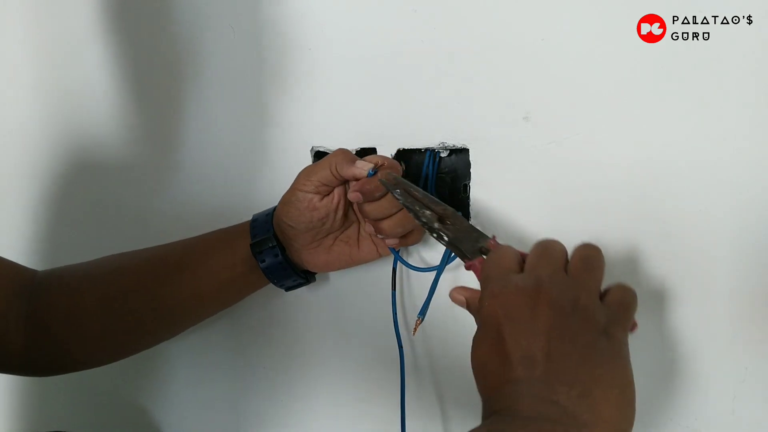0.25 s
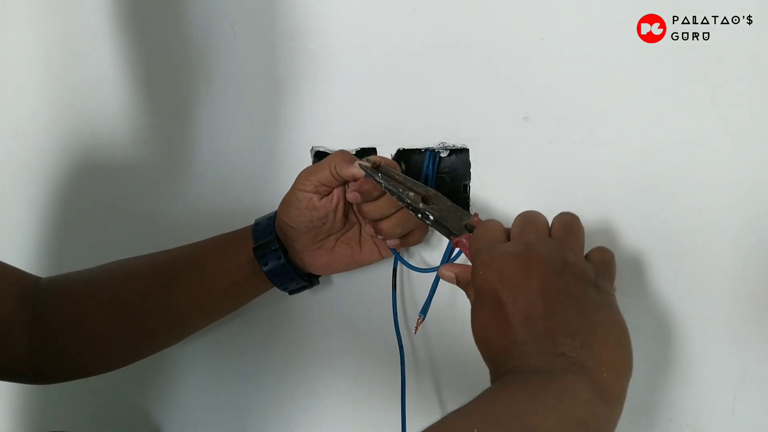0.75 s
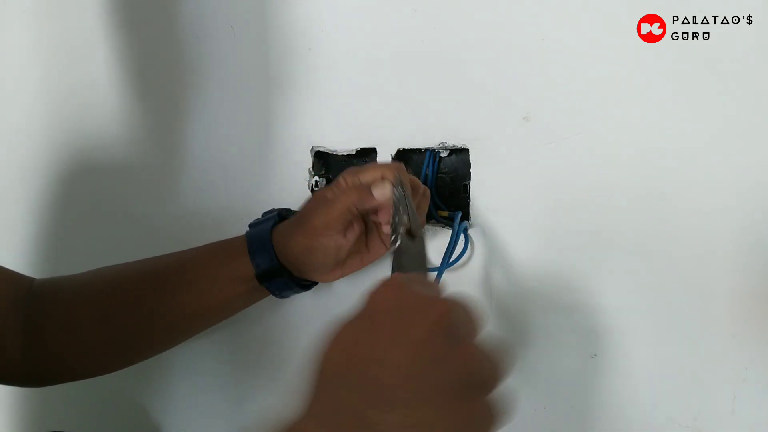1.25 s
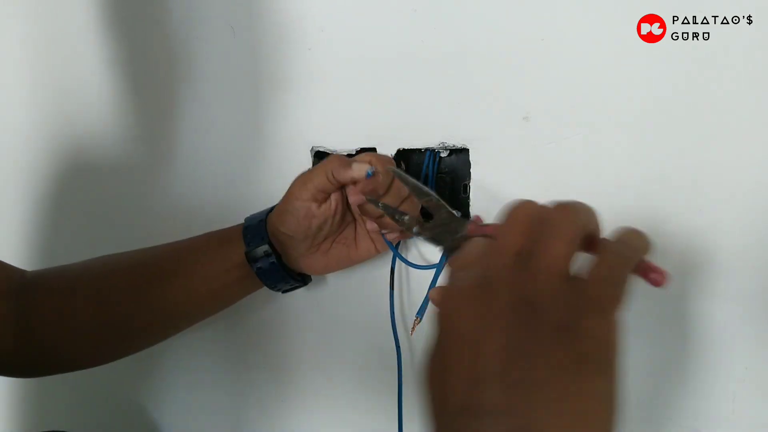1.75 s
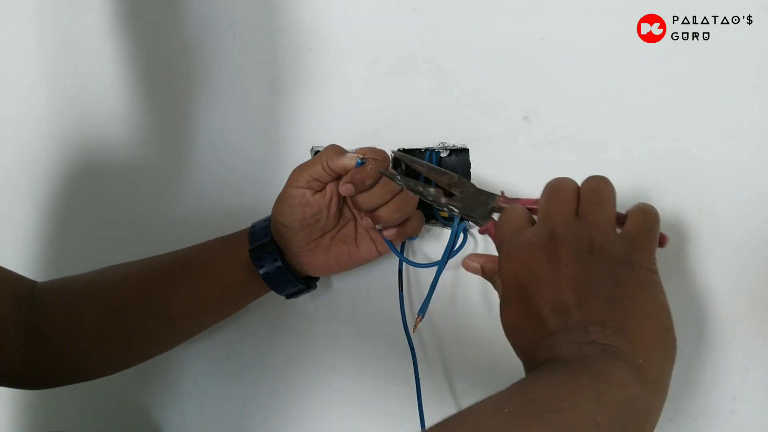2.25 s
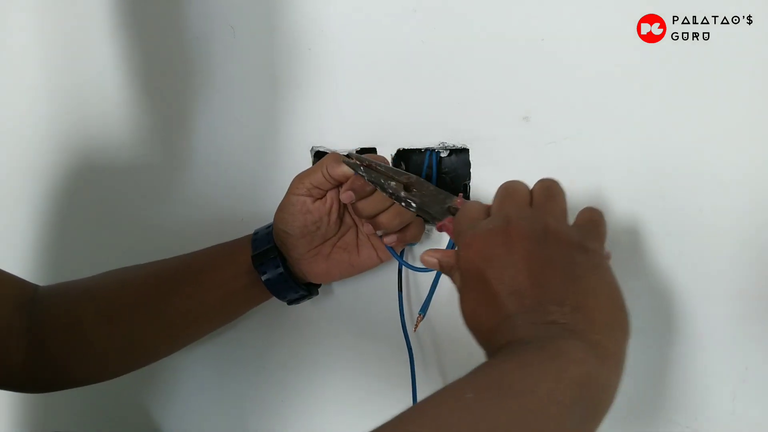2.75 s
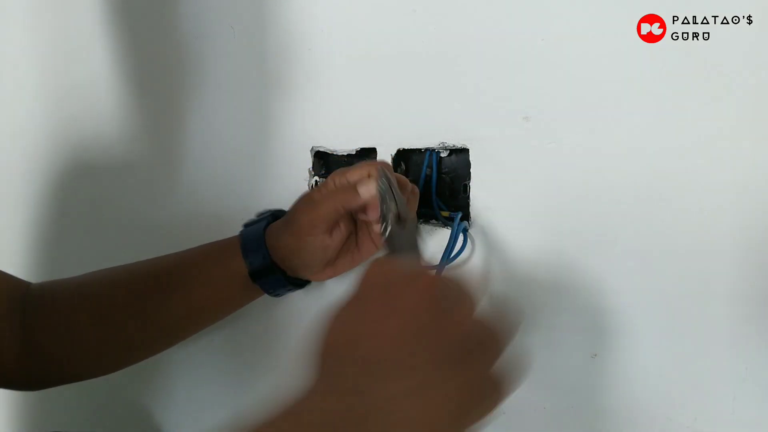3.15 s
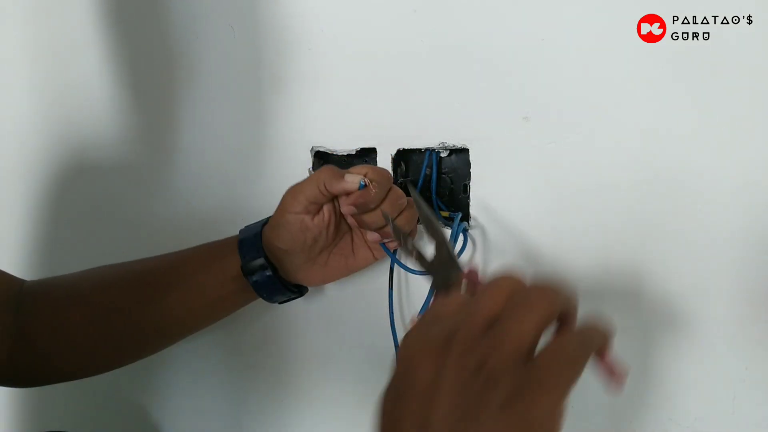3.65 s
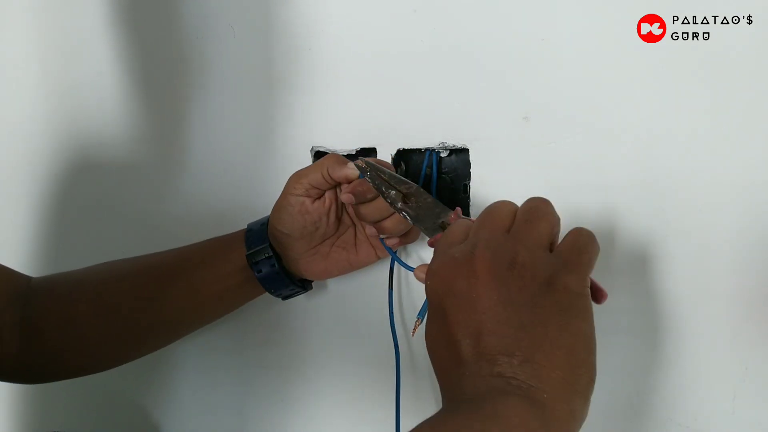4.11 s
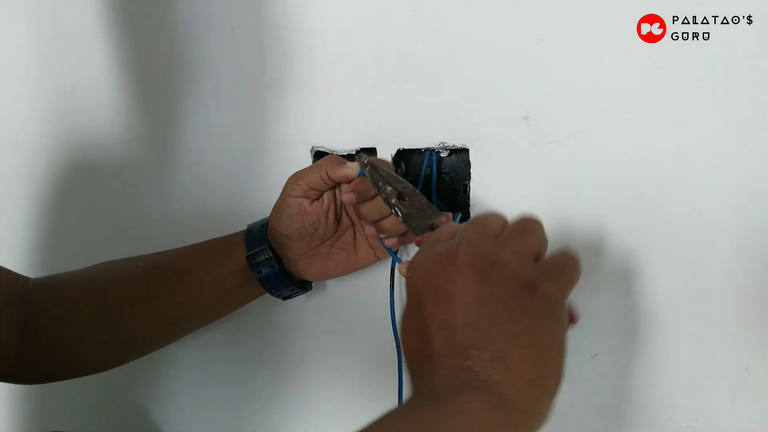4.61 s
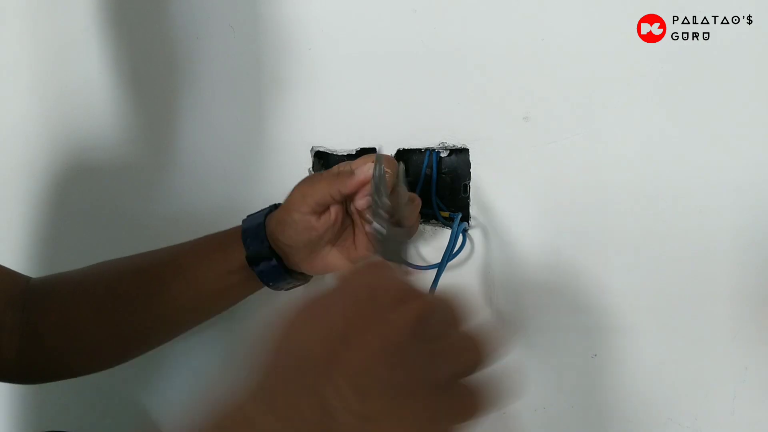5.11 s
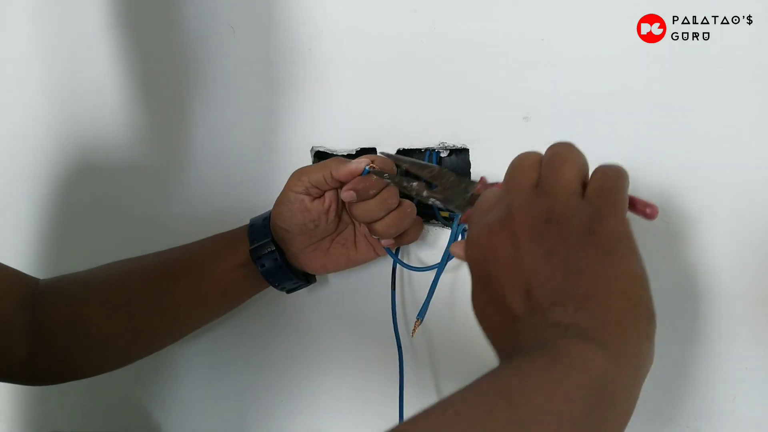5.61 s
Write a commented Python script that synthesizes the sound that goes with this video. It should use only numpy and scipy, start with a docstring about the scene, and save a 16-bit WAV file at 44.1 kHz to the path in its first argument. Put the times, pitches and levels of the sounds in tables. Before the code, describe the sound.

Stiff wires knock and creak in a wall box as pliers click and scrape, in a humming room.

```python
"""Twisting wires with pliers

Steel pliers twist copper wires together at a wall box, three turns, in a bare, humming room.
The stiff wires knock and creak in the box, and a hand bumps the handles. The jaws tick as they
grip, then scrape and squeak as they slide off. A noise gate cuts the treble of each echo short."""
import sys
import numpy as np
from scipy import signal
from scipy.fft import rfft, irfft, dct
from scipy.io import wavfile
from scipy.ndimage import uniform_filter1d, minimum_filter1d

SR = 44100
rng = np.random.default_rng(int(sys.argv[2]) if len(sys.argv) > 2 else 0)


def output_pcm(signal):
    """Save a mono or channel-first signal as 16-bit PCM at the path in sys.argv[1].

    Samples are clipped to [-1, 1] before scaling.
    """
    pcm = np.clip(np.atleast_2d(signal).T, -1, 1) * 32767
    wavfile.write(sys.argv[1], SR, np.round(pcm).astype(np.int16))


N = 258866

# The tone of the room's rumble and hiss. Each row: frequency in Hz, relative level in dB.
RUMBLE_TONE = [(14, -2), (42, 2), (60, -10.5), (76, -6.5), (97, -10), (140, -12), (165, -18.5), (370, -23),
               (617, -25.5), (944, -40.5), (1500, -58.5), (2500, -110)]
HISS_TONE = [(200, -15.5), (900, -1), (1500, 2.5), (3000, 1.5), (5000, -6.5), (8000, -11.5), (11000, -16.5),
             (13000, -26), (16000, -31)]
# How alike that noise is left and right. Each row: frequency in Hz, likeness (1 is identical).
LIKENESS = [(60, 0.69), (180, 0.49), (550, 0.35), (1650, 0), (4970, 0.0), (15000, 0.0063)]
# The room's hum. Each row: pitch in Hz, level in dB, waver in radians.
HUM_TONES = [(40.4, -57.5, 3.98), (74.3, -60.5, 2.4), (126.04, -56.5, 0.75), (186.2, -69, 1.6),
             (306.6, -71.5, 1.2)]
# The slow swell of the deep bass. Each row: time in seconds, gain in dB.
BASS_SWELL = [(0, 6), (2, 5.5), (3.5, 3.5), (4.4, 6), (5.1, 7), (5.87, 6)]
# Wires knocking in the box. Each row: start in seconds, relative level in dB, relative treble in dB.
KNOCKS = [(0.695, -30.5, -21), (1.284, -41, -2), (1.453, -30, -3.5), (1.873, -50.5, 0),
          (2.963, -50.5, -2.5), (3.091, -47.5, -4), (3.229, -33.5, -4.5), (3.372, -21.5, -2.5),
          (3.992, -44.5, -10), (4.465, -46, 0), (5.202, -44.5, -7.5), (5.595, -56.5, -20)]
# How the box and the pliers ring. Each row: pitch in Hz, level in dB, seconds to fade by 60 dB.
BOX_MODES = [(569, 1, 0.031), (650, 6.5, 0.019), (817, -5, 0.029), (1202, -15, 0.027), (1482, -17, 0.043),
             (1751, -3, 0.0094), (2290, -6.5, 0.0048), (3032, -8, 0.007), (3505, -18.5, 0.015)]
STEEL_MODES = [(2370, 6.5, 0.0053), (2850, 9.5, 0.0076), (3480, -5, 0.0068), (5350, -5, 0.0089),
               (5860, -2.5, 0.0086), (7510, -1.5, 0.028), (8240, 1, 0.025), (11300, -14, 0.0054),
               (10850, 9.5, 0.011), (11440, 3, .012), (15650, -28, .01)]
# The tone of one slip's snap. Each row: frequency in Hz, gain in dB.
SNAP_TONE = [(300, -7.5), (1200, -2), (2200, 6), (4000, 4), (6500, 3.5), (8300, 4.5), (10800, -3),
             (11800, -4), (14000, -19), (16000, -2)]
# Jaws catching on copper. Each row: start in seconds, relative level in dB, favoured pitch in Hz.
TICKS = [(0.695, -47.5, 3280), (1.048, -43, 2220), (1.1625, -47.5, 6700), (1.4162, -48, 3240),
         (1.5492, -42, 10700), (2.9123, -47.5, 2200), (3.4219, -30, 2300), (4.8852, -48, 10700),
         (4.962, -37.5, 2930), (5.1243, -40, 10900)]
# Jaws skipping. Each row: start and length in seconds, relative level in dB, favoured pitch in Hz.
SKIPS = [(1.135, 0.24, -52.5, 3110), (3.109, 0.04, -49, 7400), (3.283, 0.04, -40.5, 7400),
         (4.301, 0.04, -45.5, 7100)]
# Wires giving way. Each row: start and length in seconds, level in dB, relative treble in dB.
CREAKS = [(0.701, 0.115, -52.5, 1.5), (1.287, 0.044, -56.5, 8.5), (1.454, 0.15, -50.5, 7.5),
          (3.207, 0.066, -49, 6), (3.384, 0.17, -50, 2)]
# Jaws sliding. Each row: start and length in seconds, level in dB, favoured pitch in Hz,
# its boost in dB, tilt in dB per octave.
SCRAPES = [(1.048, 0.045, -61.5, 10700, 8.5, -3), (1.143, 0.23, -66.5, 7360, 8, -3),
           (1.49, 0.061, -54.5, 10300, 6.5, -4.5), (2.738, 0.045, -60, 4430, 9, -4),
           (3.196, 0.135, -55.5, 7160, 2, -7), (3.403, 0.028, -42.5, 8300, 1.5, -1),
           (4.324, 0.022, -59, 7400, 2, -4.5), (4.367, 0.61, -71.5, 11170, 15, -3),
           (5.085, 0.037, -57.5, 4800, 5, 0)]
# Slides that squeak. Each row: start and length in seconds, level in dB, pitch in Hz.
SQUEAKS = [(1.516, 0.025, -55, 5000), (4.96, 0.095, -58.5, 2897)]
# The tones in a squeak. Each row: multiple of the pitch, level in dB.
SQUEAK_HARMONICS = [(1, 2), (2, 1), (3, -10)]
# The room's echo. Each row: frequency in Hz, seconds to fade by 60 dB.
ECHO_FADE = [(200, 0.91), (500, 0.35), (1300, 0.5), (2700, 0.59), (5500, 0.51), (8000, 0.48), (14000, 0.37)]
# The stereo balance. Each row: frequency in Hz, dB by which left is louder than right.
BALANCE = [(500, 0), (2000, .5), (4500, 4), (8000, 0), (11500, -3)]
# The noise gate's two bands. Each row: lower edge in Hz, threshold in dB.
GATE_BANDS = [(1050, -58.5), (4000, -61.5)]

JAW_HZ = 3060  # the pitch favoured when the wires jolt the jaws


def amp(db):
    """Turns decibels into a gain."""
    return 10 ** (np.asarray(db) / 20)


def unit(x):
    """Scales a signal to an average (rms) level of 1."""
    return x / np.sqrt(np.mean(x ** 2) + 1e-20)


def read(table, hz):
    """Reads between a table's rows on a log-frequency axis."""
    row_hz, value = np.transpose(table)
    return np.interp(np.log(hz + 1), np.log(row_hz + 1), value)


def add(mix, start, sound):
    """Mixes a sound into both channels, start seconds in."""
    part = mix[:, round(start * SR):][:, :sound.shape[-1]]
    part += sound[..., :part.shape[1]]


def convolve(x, taps):
    """Filters each channel."""
    return signal.fftconvolve(np.atleast_2d(x), np.atleast_2d(taps), axes=1)


def colour(x, db_at, size=2048):
    """Changes the tone by db_at(Hz) decibels, with no ringing ahead of the sound."""
    log_gain = np.log(amp(db_at(abs(np.fft.fftfreq(size, 1 / SR)))))
    response = np.exp(np.conj(signal.hilbert(log_gain)))
    return convolve(x, np.fft.ifft(response).real[:size // 2])


def ring(modes, rise_cycles, size=4096):
    """A struck object rings with fading tones (modes); the low ones build up slowest."""
    t = np.arange(size) / SR
    wave = 0
    for hz, db, fade_s in modes:
        rise = 1 - np.exp(-(t * hz / rise_cycles) ** 2)
        wave += amp(db - 60 * t / fade_s) * np.sin(2 * np.pi * hz * t) * rise
    return wave / np.linalg.norm(wave)


def slips(length, per_s=3000, spread_db=4, fade=0.25, scatter=1.9):
    """Sticking and slipping makes uneven clicks; each spreads its own way, so left and right differ."""
    happens = rng.random(SR) < per_s / SR
    strength = amp(spread_db * np.minimum(rng.exponential(1, SR), 3))
    push = rng.choice([-1, 1], SR) + scatter * rng.standard_normal((2, SR))
    clicks = (happens * push * strength)[:, :int(length * SR)]
    return unit(clicks * signal.windows.tukey(clicks.shape[1], fade))


def background(waver_hz=2.27, low_cut_hz=33, rumble_db=-49, hiss_db=-65.5):
    """The room's low rumble and wavering hum, under a soft hiss."""
    hz, t = np.fft.rfftfreq(N, 1 / SR), np.arange(N) / SR
    left, other = rfft(rng.standard_normal((2, N)))
    alike = np.clip(read(LIKENESS, hz), 0, 1) ** 1.04
    right = alike * left + np.sqrt(1 - alike ** 2) * other
    noise = np.array([left, right]) * hz ** 2 / np.hypot(hz ** 2, low_cut_hz ** 2)
    out = np.zeros((2, N))
    for tone, db in [(RUMBLE_TONE, rumble_db), (HISS_TONE, hiss_db)]:
        out += amp(db) * unit(irfft(noise * amp(read(tone, hz)), N))
    for pitch, db, waver in HUM_TONES:
        slow_noise = irfft(rfft(rng.standard_normal((2, N))) * np.exp(-(hz / waver_hz) ** 2), N)
        drift, flutter = map(unit, slow_noise)
        out += amp(db) * unit((1 + 0.36 * flutter) * np.sin(2 * np.pi * pitch * t + waver * drift))
    return out


def swell(x, below_hz=90):
    """The deepest rumble rises and sinks slowly."""
    deep = irfft(rfft(x) / (1 + (np.fft.rfftfreq(N, 1 / SR) / below_hz) ** 6), N)
    gain_db = np.interp(np.arange(N) / SR, *np.transpose(BASS_SWELL))
    return x - deep + deep * amp(gain_db)


def knocks(boost_db=3, brighten_db=5, jaw_db=-17):
    """Each wire knock rings the box with its own brightness; louder, brighter ones jolt the jaws more."""
    out = np.zeros((2, N))
    for start, db, treble_db in KNOCKS:
        box = ring(BOX_MODES, rise_cycles=1.69)
        blow = colour(box, lambda f: (treble_db + brighten_db) * read([(750, 0), (1500, 1)], f))
        add(out, start, amp(db + boost_db) * blow / abs(blow).max())
        add(out, start, amp(db + 0.28 * treble_db + jaw_db) * tick(JAW_HZ))
    return out


def pliers(force, hz, boost_db, tilt_db, ring_db=-6, width_hz=750):
    """A snap plus the ring of the steel; the point of contact favours the pitches near hz."""
    def tone_db(f):
        bump = np.exp(-((f - hz) / width_hz) ** 2)
        return read(SNAP_TONE, f) + tilt_db * np.log2((f + 100) / hz) + boost_db * bump

    steel = amp(ring_db) * ring(STEEL_MODES, rise_cycles=1)
    steel[0] += 1  # the snap
    return colour(convolve(force, steel), tone_db)


def tick(hz, skid_s=0.0014, size=400):
    """One sharp contact of the jaws, with a brief gritty skid."""
    force = rng.standard_normal((2, size)) * np.exp(-np.arange(size) / SR / skid_s)
    force[:, 0] += 1
    wave = pliers(force, hz, boost_db=9, tilt_db=-1.5)
    return wave / abs(wave).max()


def jaw_ticks(catch_db=3, skip_db=2, tooth_s=0.0283, jitter=0.03, spread_db=1.63):
    """The jaws catch once, or skip over the wire tooth by tooth as the pliers turn."""
    out = np.zeros((2, N))
    for start, db, hz in TICKS:
        add(out, start, amp(db + catch_db) * tick(hz))
    for start, length, db, hz in SKIPS:
        for after in np.arange(0, length, tooth_s):
            late, weak = rng.standard_normal(2)
            when = start + after + tooth_s * jitter * late
            add(out, when, amp(db + skip_db - spread_db * weak) * tick(hz))
    return out


def creaks(jaw_db=-19, relax_db_per_s=68):
    """Quick slips of the twisted wires shake the box and, faintly, the jaws, fading as the wires relax."""
    out = np.zeros((2, N))
    treble_share = [(750, 0.03), (1500, 0.95), (3000, 1.44)]  # frequency in Hz, share of treble_db
    for start, length, db, treble_db in CREAKS:
        force = slips(length, per_s=1600, spread_db=3, fade=0.15, scatter=0.9)
        force *= amp(-relax_db_per_s * np.arange(force.shape[1]) / SR)
        box = convolve(force, ring(BOX_MODES, rise_cycles=0.52))
        box = colour(box, lambda f: treble_db * read(treble_share, f))
        jaws = pliers(force, JAW_HZ, boost_db=1.5, tilt_db=-2)
        for wave, share_db in [(box, 0), (jaws, jaw_db + 0.5 * treble_db)]:
            add(out, start, amp(db + share_db) * wave * np.sqrt(force.size) / np.linalg.norm(wave))
    return out


def hand_bump(start=1.047, peak_db=-36.5, hz=267, fade_s=0.028):
    """The hand takes hold of the handles with a soft, low thud."""
    out = np.zeros((2, N))
    wave = ring([(hz, 0, fade_s), (hz * 1.23, -3, fade_s / 2)], rise_cycles=0.21)
    add(out, start, amp(peak_db) * wave / abs(wave).max())
    return out


def scrapes():
    """The toothed jaws drag over the copper in a dense run of slips."""
    out = np.zeros((2, N))
    for start, length, db, hz, boost_db, tilt_db in SCRAPES:
        force = slips(length)
        wave = pliers(force, hz, boost_db, tilt_db)
        add(out, start, amp(db) * wave * np.sqrt(force.size) / np.linalg.norm(wave))
    return out


def squeaks(waver=0.057, rasp_db=-4):
    """Nearly regular slips make a hoarse note over the rasp of the jaws."""
    out = np.zeros((2, N))
    for start, length, db, hz in SQUEAKS:
        force = slips(length)
        count = force.shape[1]
        wobble = unit(uniform_filter1d(rng.standard_normal((2, count)), 40))
        phase = 2 * np.pi * np.cumsum(hz * (1 + waver * wobble), axis=1) / SR
        tone = sum(amp(level) * np.sin(multiple * phase) for multiple, level in SQUEAK_HARMONICS)
        tone = unit(tone * signal.windows.tukey(count, 0.25))
        rasp = unit(pliers(force, hz, boost_db=11, tilt_db=1)[:, :count])
        add(out, start, amp(db) * unit(tone + amp(rasp_db) * rasp))
    return out


def room(x, echo_db, build_s=0.0051, slot=12):
    """Adds dense echoes from the bare walls, different on the left and right."""
    count = SR // slot  # one echo in each slot of samples
    echoes = np.zeros((2, count * slot))
    arrivals = np.arange(count) * slot + rng.integers(0, slot, (2, count))
    np.put_along_axis(echoes, arrivals, rng.choice([-1, 1], (2, count)), axis=1)
    hz, t, spectra = signal.stft(echoes, SR, nperseg=256)
    fade = amp(-60 * t / read(ECHO_FADE, hz)[:, None])
    _, tail = signal.istft(spectra * fade, SR, nperseg=256)
    tail *= np.minimum(np.arange(tail.shape[1]) / SR / build_s, 1)
    return x + amp(echo_db) * convolve(x, tail / np.linalg.norm(tail[0]))[:, :N]


def gate(band, threshold_db, depth_db=15, knee_db=0.3, window=180, hold=260, ramp=130):
    """Opens at once, holds a moment, then turns the band down when it sinks under the threshold."""
    power = uniform_filter1d((band ** 2).mean(0), window)  # window, hold and ramp are in samples
    level_db = 10 * np.log10(abs(power) + 1e-14)
    held_db = -minimum_filter1d(-level_db, hold, origin=hold // 2 - 1)
    shut = 0.5 - 0.5 * np.tanh((held_db - threshold_db) / (2 * knee_db))
    return band * amp(-depth_db * uniform_filter1d(shut, ramp))


def scene():
    """The box and pliers echo in the humming room, their treble a little unequal left and right."""
    work = room(knocks() + hand_bump(), echo_db=-2)
    work += room(creaks(), echo_db=0)
    work += room(jaw_ticks(), echo_db=1.5)
    work += room(scrapes() + squeaks(), echo_db=0.98)
    lean_db = read(BALANCE, np.fft.rfftfreq(N, 1 / SR)) / 2
    return irfft(rfft(work) * amp([lean_db, -lean_db]), N) + swell(background())


def record(dry, noise_db=-86.5, cutoff_hz=15850):
    """Gates two bands above the bass, adds faint electronic noise and cuts the highest treble."""
    hz, spectrum = np.arange(N) * SR / (2 * N), dct(dry, norm="ortho")

    def above(edge_hz):
        return dct(spectrum * (1 - 1 / (1 + (hz / edge_hz) ** 8)), type=3, norm="ortho")

    (mid_hz, mid_db), (top_hz, top_db) = GATE_BANDS
    upper, top = above(mid_hz), above(top_hz)
    gated = dry - upper + gate(upper - top, mid_db) + gate(top, top_db)
    noise = amp(noise_db) * rng.standard_normal((2, N))
    low_pass = signal.firwin(511, cutoff_hz, window=("kaiser", 9), fs=SR)
    return signal.oaconvolve(gated + noise, low_pass[None], "same")


dry = scene()
out = record(dry)
output_pcm(out)
```